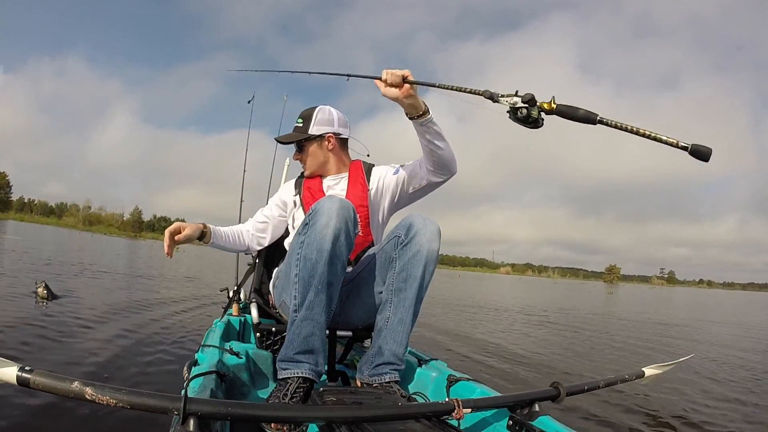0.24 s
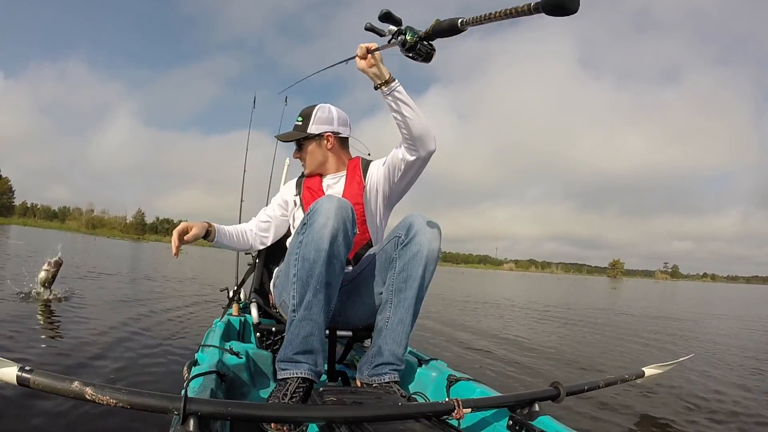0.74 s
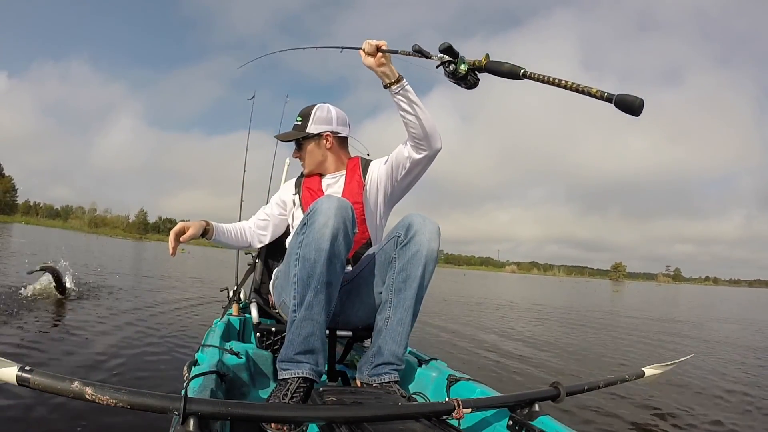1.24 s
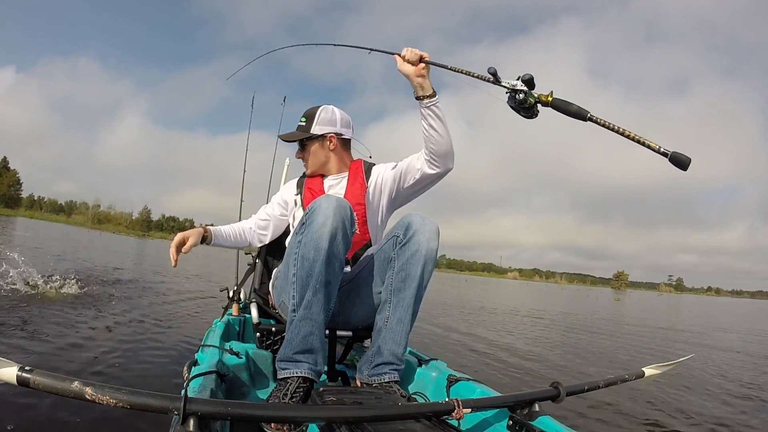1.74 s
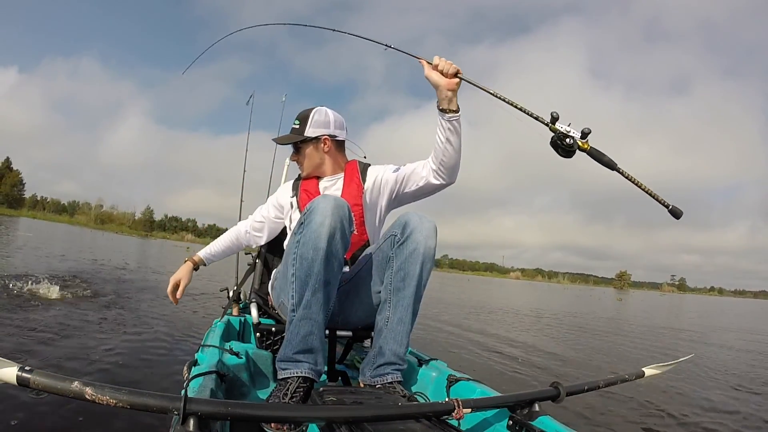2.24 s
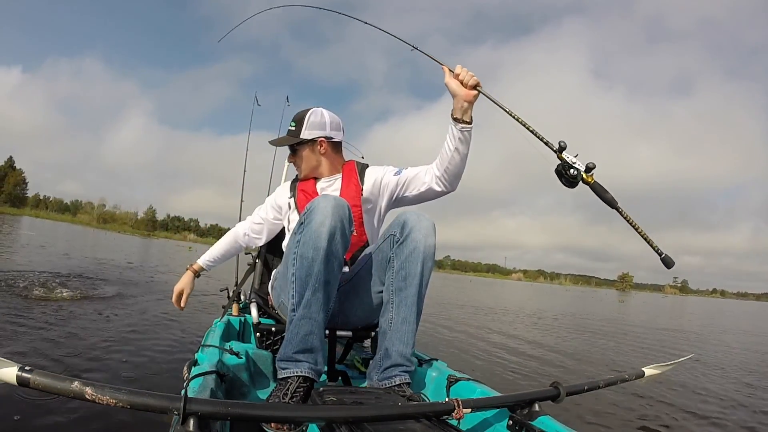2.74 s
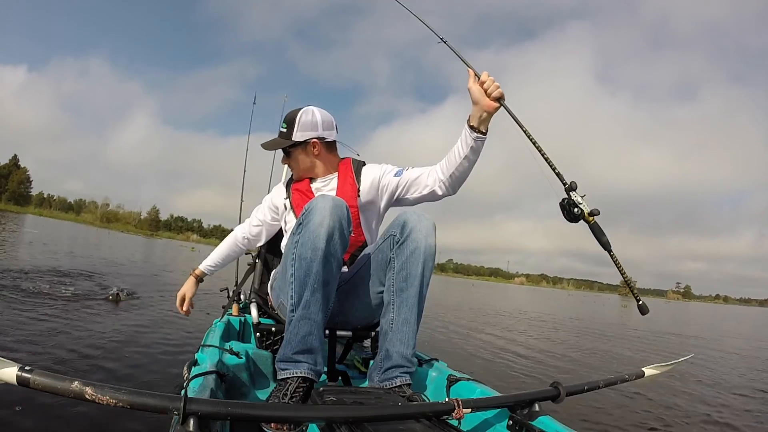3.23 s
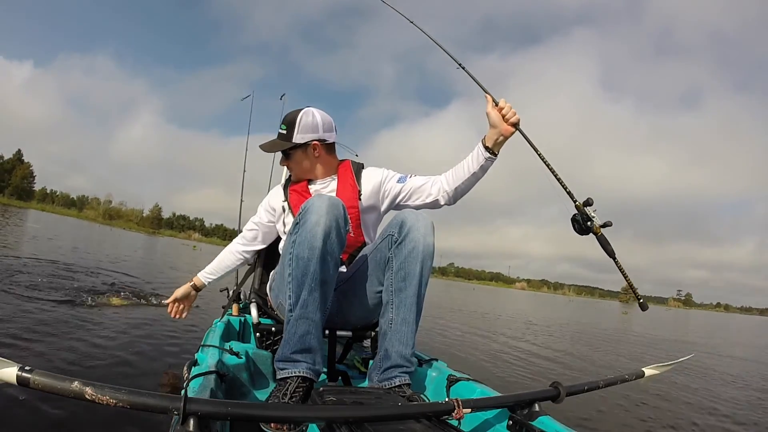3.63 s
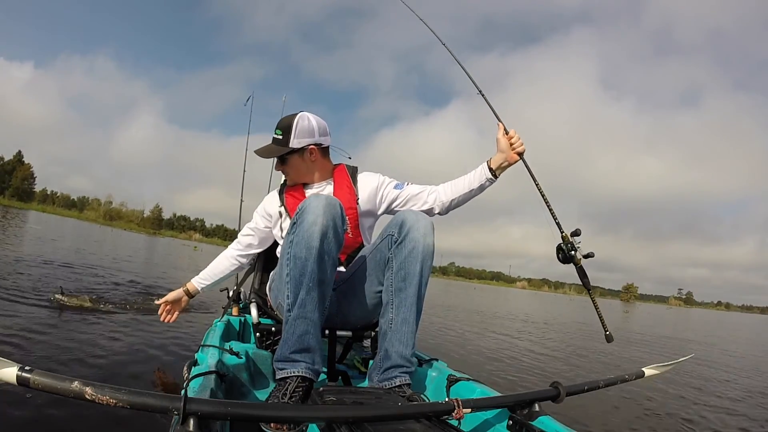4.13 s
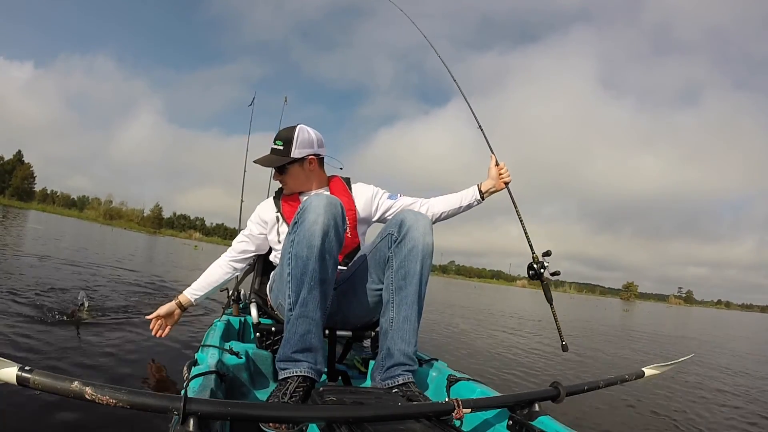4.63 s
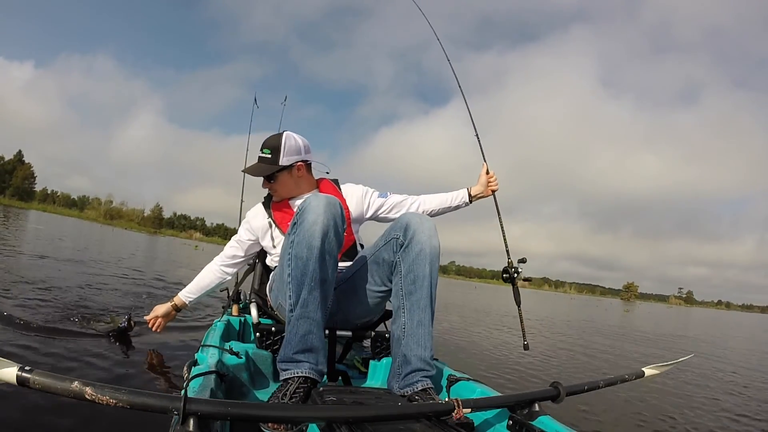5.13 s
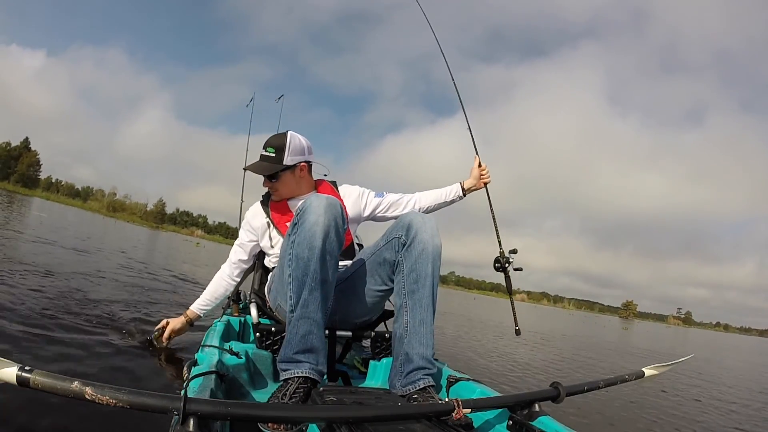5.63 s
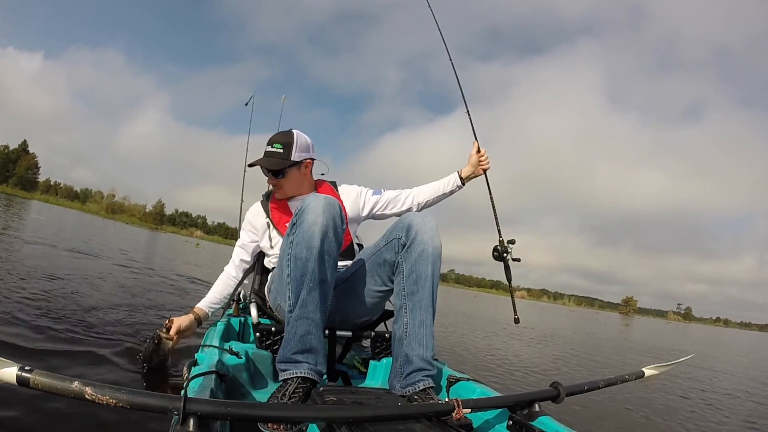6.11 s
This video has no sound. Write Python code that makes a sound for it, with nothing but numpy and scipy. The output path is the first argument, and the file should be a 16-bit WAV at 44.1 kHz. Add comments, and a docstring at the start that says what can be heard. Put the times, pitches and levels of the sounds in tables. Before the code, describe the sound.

Low, slowed-down watery gulps and splashes from a thrashing fish, then brighter small slaps and bubbles beside a kayak, fading to quiet lake breeze.

```python
"""A breeze rumbles over a lake; then a hooked fish leaps and thrashes beside a kayak, heard through a camera's
waterproof housing. Its blows trap air pockets that gulp (decaying tones), its tail slaps (noise bursts), water
churns and sprays (swarms of ringing bubbles and drops), and bubbles and falling drops sing (sliding tones).
The leap plays at half speed, an octave down; the fish is then drawn in to the hand, sloshing, at normal speed."""
import sys
import numpy as np
from scipy import signal
from scipy.fft import rfft, irfft
from scipy.io import wavfile

SR = 44100
rng = np.random.default_rng(int(sys.argv[2]) if len(sys.argv) > 2 else 0)


def waveform_to_disk(signal):
    """Save audio, clipped to [-1, 1], as 16-bit WAV at the path in sys.argv[1]."""
    frames = np.transpose(np.atleast_2d(signal))
    scaled = np.clip(frames, -1, 1) * 32767
    samples = np.round(scaled).astype(np.int16)
    wavfile.write(sys.argv[1], SR, samples)


N = 280910

T = np.arange(N) / SR
FREQ_HZ = np.arange(N // 2 + 1) * SR / N
SLOW_UNTIL_S = 2.94   # playing time


def from_db(db):
    """Decibels to gain."""
    return 10 ** (np.asarray(db) / 20)


def rms_one(x):
    """Scale to rms 1."""
    return x / np.sqrt(np.mean(x ** 2) + 1e-20)


def speed(s):
    """Playing speed at playing time s."""
    return .5 if s < SLOW_UNTIL_S else 1


def real_time(s):
    """Seconds gone by on the lake at playing time s."""
    return s - np.minimum(s, SLOW_UNTIL_S) / 2


def gain_curves(rows):
    """Columns of dB over playing time, as gains in real time."""
    s, *columns = np.transpose(rows)
    return [from_db(np.interp(T, real_time(s), db)) for db in columns]


def at_hz(points, hz):
    """Read a spectrum in dB on a log-frequency axis."""
    f, db = np.transpose(points)
    return np.interp(np.log(np.maximum(hz, 1)), np.log(f), db)


def add(out, s, sound):
    """Mix a sound in at the real time of playing time s."""
    i = int(real_time(s) * SR)
    out[i:i + len(sound)] += sound[:N - i]


def cut(x, hz, kind, order=2):
    """Butterworth filter."""
    return signal.sosfilt(signal.butter(order, hz, kind, fs=SR, output="sos"), x)


def drift(rate_hz):
    """Slow random curve of rms 1."""
    spectrum = rfft(rng.standard_normal(N))
    return rms_one(irfft(spectrum / (1 + (FREQ_HZ / rate_hz) ** 2), N))


def shaped_noise(spectrum):
    """Noise with the given spectrum, rms 1."""
    white = rfft(rng.standard_normal(N))
    return rms_one(irfft(white * from_db(at_hz(spectrum, FREQ_HZ)), N))


def resonate(x, hz, width_hz):
    """Two-pole resonance with gain 1 at its peak."""
    r = np.exp(-np.pi * width_hz / SR)
    zeros = np.array([1, 0, -1]) * (1 - r * r) / 2
    poles = [1, -2 * r * np.cos(2 * np.pi * hz / SR), r * r]
    return signal.lfilter(zeros, poles, x + 1e-18)


def grains(per_s, spread_db):
    """Random impacts, many small and a few large."""
    level_db = spread_db * np.minimum(rng.exponential(1, N), 3.5)
    impacts = from_db(level_db) * rng.choice([-1, 1], N)
    return impacts * (rng.random(N) < per_s / SR)


def bubbles(sizes, per_s, ring_cycles, spread_db, count=22):
    """Swarm of bubbles or drops, each ringing at the pitch of its size; rms 1."""
    births = grains(per_s, spread_db)
    pitches_hz = np.geomspace(sizes[0][0], sizes[-1][0], count)
    dealt = rng.integers(0, count, N)
    swarm = np.zeros(N)
    for k, hz in enumerate(pitches_hz):
        ring = resonate(births * (dealt == k), hz, hz / (np.pi * ring_cycles))
        swarm += from_db(at_hz(sizes, hz)) / hz * ring
    return rms_one(swarm)


# treble resonances of the plastic shell: (centre [Hz], width [Hz], relative level [dB])
HOUSING_MODES = [(3640, 100, -6), (3700, 150, -9.5), (4518, 220, 10), (4830, 1550, -7.5), (5650, 330, -4),
                 (6080, 260, -5.5), (7600, 160, -12), (9300, 500, -32.5), (10480, 700, -11.5),
                 (11800, 330, -19)]


def housing(x):
    """The plastic shell passes treble mostly at its resonances; rms 1."""
    rings = sum(from_db(db) * resonate(x, hz, width_hz) for hz, width_hz, db in HOUSING_MODES)
    return rms_one(cut(cut(rings, 2800, "high", order=3), 13800, "low", order=6))


# spectrum of breeze and distant water: (frequency [Hz], relative density [dB per Hz])
BREEZE_SPECTRUM = [(20, -10.5), (45, 0), (90, 2.5), (135, 3), (190, -3), (270, -6.5), (400, -16),
                   (800, -19), (1100, -29), (2000, -29), (4000, -35.5), (8000, -43.5), (12000, -47.5),
                   (13200, -50)]
# rumble strength: (time as played [s], level [dB])
GUSTS_CURVE = [(0, -41), (1.8, -40), (2.4, -40), (2.9, -40.5), (6.37, -40.5)]


def breeze(buffet_db=1.0, buffet_rate_hz=58, hiss_db=-41, rumble_top_hz=350):
    """Uneven wind rumble on the housing, under a smooth hiss."""
    air = shaped_noise(BREEZE_SPECTRUM)
    rumble = irfft(rfft(air) / (1 + (FREQ_HZ / rumble_top_hz) ** 4), N)
    strength, = gain_curves(GUSTS_CURVE)
    buffeting = from_db(buffet_db * drift(buffet_rate_hz))
    return rumble * strength * buffeting + from_db(hiss_db) * (air - rumble)


# water between bouts: (time as played [s], bubbling wash [dB], drops falling back [dB], spray mist [dB])
WASH_LEVELS = [(0, -58.5, -74, -95), (.45, -59, -62, -67.5), (.95, -39.5, -48, -54),
               (1.3, -48.5, -51.5, -59.5), (1.8, -40, -50.5, -59.5), (2.4, -43, -53, -62.5),
               (2.95, -52, -69.5, -83), (3.7, -55.5, -62, -68.5), (4.1, -52.5, -67.5, -75),
               (5.6, -55, -67, -79), (6.37, -59.5, -66, -77)]
# bouts: (time as played [s], length as played [s], churning bubbles [dB], splashing droplets [dB])
THRASH_BOUTS = [(0.5, .08, -49.5, -63), (0.6, 0.079, -47, -50.5), (0.746, .032, -23.5, -39.5),
                (0.881, 0.1, -38.5, -46.5), (1.1, 0.015, -40, -52.5), (1.41, 0.15, -38.5, -49),
                (1.644, 0.026, -29.5, -37.5), (1.935, 0.041, -29, -44), (2.03, 0.021, -36, -41.5),
                (2.3, 0.12, -38.5, -65), (2.76, 0.093, -44, -62), (3.4, 0.095, -43, -50),
                (3.55, 0.19, -43.5, -53), (3.629, 0.026, -32.5, -60), (3.92, 0.079, -46, -71),
                (4.28, 0.052, -42.5, -70), (4.519, 0.018, -45, -64), (4.61, 0.066, -43.5, -64),
                (4.758, 0.092, -43.5, -63), (5.02, 0.049, -46.5, -78), (5.56, .05, -54.5, -69)]


def agitation(attack_s=0.0098, churn_release_s=0.012, drops_release_s=0.024, spray_re_droplets_db=-20):
    """Gains of churn, droplets, spray: bouts swell, hold and die into the wash; drops fall on after the churn."""
    power = np.square(gain_curves(WASH_LEVELS))
    release_s = np.array([[churn_release_s], [drops_release_s], [drops_release_s]])
    for s, length_s, churn_db, droplets_db in THRASH_BOUTS:
        t = T - real_time(s)
        swell = np.minimum(t, 0) / attack_s
        ebb = np.maximum(t - length_s * speed(s), 0) / release_s
        peak = from_db([[churn_db], [droplets_db], [droplets_db + spray_re_droplets_db]])
        power += (peak * np.exp(np.maximum(swell - ebb, -20))) ** 2
    return np.sqrt(power)


# churning bubble strength by size: (real-time pitch [Hz], relative level [dB])
CHURN_SIZES = [(330, -10.5), (450, 1), (560, 3), (720, 4.5), (880, 2), (1020, -0.5), (1150, -12)]


def churn():
    """Big bubbles ring under the fish; rms about 1."""
    return cut(bubbles(CHURN_SIZES, per_s=910, ring_cycles=5.6, spread_db=5.0), 1246, "low", order=4)


# plinking droplet strength by size: (real-time pitch [Hz], relative level [dB]); also colours slaps
PLINK_SIZES = [(1100, 4), (1400, -4), (1700, 1.5), (2100, -5), (2400, -4), (2900, -20), (3350, -4),
               (3700, -24.5)]


def droplets():
    """Droplets plink back on the lake; rms about 1."""
    return cut(bubbles(PLINK_SIZES, per_s=1500, ring_cycles=6.6, spread_db=4.5), 3300, "low", order=4)


# fine spray strength by drop size: (real-time pitch [Hz], relative level [dB])
MIST_SIZES = [(3000, 4.5), (4400, -5.5), (5200, -2), (7000, 1.5), (9500, 4.5), (11500, 5.5), (13500, 9.5)]


def spray(clump_db=1.0, clump_rate_hz=57):
    """Fine drops fizz in clumps through the housing."""
    fizz = housing(bubbles(MIST_SIZES, per_s=5000, ring_cycles=8.9, spread_db=4.0))
    return fizz * from_db(clump_db * drift(clump_rate_hz))


def stirred_water():
    """Churn, droplets and spray follow the agitation of the water."""
    churn_gain, droplet_gain, spray_gain = agitation()
    return churn_gain * churn() + droplet_gain * droplets() + spray_gain * spray()


def sliding_tones(rows, rise_oct_per_s, rough, broken_db=3.0):
    """Bubbles or drop clusters slide in pitch as they change size; roughness 0-1 breaks up the tone."""
    out = np.zeros(N)
    scatter = (drift(rate_hz=600) + 1j * drift(rate_hz=600)) / np.sqrt(2)
    scatter = scatter * rms_one(from_db(broken_db * drift(rate_hz=120)))   # uneven bunches
    noisy = rough ** 2
    for k, (s, length_s, start_hz, db) in enumerate(rows):
        along = np.linspace(0, 1, int(length_s * speed(s) * SR))
        real_hz = start_hz / speed(s) * 2 ** (rise_oct_per_s * T[:len(along)])
        phase = 2 * np.pi * np.cumsum(real_hz) / SR
        cluster = 1 - noisy + noisy * scatter[k * SR // 10:][:len(along)]
        add(out, s, from_db(db) * np.sin(np.pi * along) * np.real(cluster * np.exp(1j * phase)))
    return out


# streams of like-sized drops: (time [s], length [s], start pitch [Hz], level [dB]), all as played
TRICKLE_STREAMS = [(.74, .02, 842, -32), (.899, 0.01, 2113, -31.5), (1.368, 0.017, 2950, -48.5),
                   (1.437, 0.016, 2027, -32), (1.715, .05, 3040, -47.5), (2.365, 0.087, 4800, -62),
                   (2.405, 0.074, 3350, -54), (2.445, 0.074, 2500, -51.5), (2.685, .11, 1420, -52.5),
                   (3.395, 0.023, 1867, -43), (3.58, 0.038, 2056, -44), (3.622, 0.049, 1827, -38.5),
                   (3.625, 0.071, 3560, -52.5), (3.89, 0.013, 2130, -44), (3.93, 0.014, 1865, -45),
                   (4.168, 0.012, 2110, -46), (4.28, 0.011, 970, -34.5), (4.33, 0.015, 2020, -47),
                   (4.6, .09, 2290, -54), (4.79, 0.058, 2150, -52.5)]


def trickles():
    """Drops falling back give rough tones that sink; slide in real time."""
    return sliding_tones(TRICKLE_STREAMS, rise_oct_per_s=-3, rough=0.85)


# single bubbles: (time [s], length [s], start pitch [Hz], level [dB]), all as played
GURGLE_BUBBLES = [(.455, 0.056, 643, -55), (3.295, .032, 475, -38.5), (3.37, 0.027, 570, -38.5),
                  (3.925, 0.043, 229, -35.5), (3.955, 0.046, 339, -36), (3.983, 0.028, 655, -43),
                  (4.042, 0.048, 532, -41), (4.18, .04, 655, -49)]


def gurgles():
    """Single bubbles sing upwards, nearly clean, as they surface; slide in real time."""
    return sliding_tones(GURGLE_BUBBLES, rise_oct_per_s=18.7, rough=0.19)


# slaps and flicks: (time as played [s], splash level [dB], spray level [dB], decay in real time [s])
SURFACE_SLAPS = [(0.49, -52, -44, 0.0021), (0.596, -41, -43, 0.0065), (0.731, -32.5, -43.5, 0.014),
                 (0.901, -23.5, -32.5, 0.0042), (0.9245, -26.5, -30, .0036), (1.1, -41, -46.5, 0.0075),
                 (1.34, -36.5, -47.5, 0.015), (1.432, -33, -46, 0.0056), (1.649, -31, -38.5, 0.0059),
                 (1.658, -27.5, -37, 0.0049), (1.8, -40, -51.5, 0.0084), (1.952, -35, -63, 0.0063),
                 (2.18, -49, -44.5, 0.0026), (2.297, -40, -54, 0.011), (3.406, -40.5, -61, 0.0061),
                 (3.449, -41, -57, 0.0059), (3.488, -40, -56, 0.006), (3.53, -40.5, -62, 0.0092),
                 (3.625, -30.5, -65, 0.0037), (3.63, -35, -62, 0.0049), (3.723, -40, -53, 0.0058),
                 (3.762, -31, -73, 0.0016), (4.283, -43, -52, 0.0029), (5.4106, -43, -47.5, 0.0024),
                 (5.572, -42, -54, .004)]


def slaps(attack_s=0.0011):
    """A slap's many drops merge into one noise burst, with a hiss of spray on top."""
    splash_burst, spray_burst = np.zeros(N), np.zeros(N)
    t = T[:SR // 10]
    for s, splash_db, spray_db, decay_s in SURFACE_SLAPS:
        burst = (1 - np.exp(-t / attack_s)) * np.exp(-t / decay_s)
        add(splash_burst, s, from_db(splash_db) * burst)
        add(spray_burst, s, from_db(spray_db) * burst)
    splash = cut(shaped_noise(PLINK_SIZES), 450, "high", order=3)
    splash = rms_one(cut(splash, 5000, "low", order=5))
    return splash_burst * splash + spray_burst * housing(rng.standard_normal(N))


def hull_echoes(x, level_db=-14, decay_s=0.014, delay_s=.003):
    """Hull and waves scatter a short dull tail."""
    t = T[:SR // 10]
    tail = cut(rng.standard_normal(len(t)), 1100, "low") * np.exp(-t / decay_s) * (t > delay_s)
    tail = tail / np.sqrt(np.sum(tail ** 2) * SR / 3000)
    return from_db(level_db) * signal.fftconvolve(x, tail)[:N]


# blows that trap air: (time as played [s], first pocket level [dB], first pitch as played [Hz],
# first pocket ring [cycles], length of the run of pockets in real time [s])
AIR_BLOWS = [(0.5417, -31.5, 462, 4.8, 0.0046), (0.601, -24.5, 360, 0.45, .005),
             (0.6706, -35.5, 328, 3.5, .005), (0.7379, -11, 400, 3.2, 0.0077),
             (0.754, -7.5, 364, 0.46, 0.011), (0.78, -7.5, 310, 1.4, 0.017), (0.813, -16, 239, 0.83, 0.01),
             (0.8788, -17.5, 256, 0.39, 0.015), (0.9157, -25, 187, 1.5, 0.016),
             (0.927, -19, 380, .4, 0.0076), (0.954, -23.5, 316, 0.97, 0.016),
             (1.1234, -26.5, 357, 1.05, 0.0041), (1.252, -33, 344, 2.1, .008),
             (1.4407, -23.5, 300, 2.4, 0.0086), (1.5201, -19.5, 343, 0.5, .006),
             (1.5338, -17.5, 333, 2.2, 0.031), (1.5773, -22, 330, 1.5, .006),
             (1.6294, -12, 260, 1.2, 0.0064), (1.6673, -16.5, 428, 0.64, 0.0076),
             (1.807, -24.5, 493, 1.9, .006), (1.9257, -24, 331, 1.6, 0.084),
             (1.966, -23.5, 133, 1.9, 0.0064), (1.9682, -15.5, 271, 0.74, 0.017),
             (2.0628, -18, 223, 0.82, 0.011), (2.3014, -14.5, 359, 1.2, 0.013),
             (2.3163, -17.5, 150, 0.68, 0.014), (2.3438, -25.5, 283, 3.2, 0.011),
             (3.4131, -33, 882, 1.4, .004), (3.4516, -27.5, 864, 1.2, .004),
             (3.4893, -21.5, 588, 2.4, 0.004), (3.5351, -31.5, 700, 2.5, 0.0091),
             (3.5951, -29.5, 594, 2.3, .005), (3.6326, -11, 694, 1.37, 0.0036),
             (3.6426, -15.5, 625, 0.83, .008), (3.6812, -32, 594, 2.5, 0.011),
             (3.71, -34.5, 765, 3.1, 0.027), (4.282, -26.5, 700, 3, .004), (4.2872, -16, 473, 0.18, 0.027),
             (4.5136, -36.5, 940, 3.7, 0.0066), (4.7689, -33, 610, 2.8, .02),
             (5.4324, -36, 650, 0.68, .004), (5.577, -37, 546, 1.7, .006), (5.657, -38, 656, 1.2, .005),
             (5.95, -42.5, 854, 7.1, .006)]


def pockets(count=6, gap_s=.0046, fade_db=16.5, sag_oct_per_s=16, later_ring_cycles=0.99,
            scatter_db=2, scatter_oct=0.29, scatter_gaps=0.21):
    """A blow closes one ringing pocket, then a run of weaker, lower ones: (s, dB, Hz, cycles)."""
    rows, k = [], np.arange(count)
    chances = rng.standard_normal((len(AIR_BLOWS), 3, count))
    for (s, db, hz, ring_cycles, run_s), chance in zip(AIR_BLOWS, chances):
        late, louder, higher = chance * (k > 0)
        age_s = gap_s * (k + scatter_gaps * late)   # real time
        levels_db = db - fade_db * age_s / run_s + scatter_db * louder
        pitches_hz = hz * 2 ** (scatter_oct * higher - sag_oct_per_s * age_s)
        rings = np.where(k > 0, later_ring_cycles, ring_cycles)
        rows += zip(s + age_s / speed(s), levels_db, pitches_hz, rings)
    return rows


def gulps(least_rise_cycles=0.71, rise_share=0.6, glide=0.031, overtone_ratio=1.9, overtone_db=-21):
    """Each pocket swells and rings down, rising a little in pitch as it nears the surface."""
    out = np.zeros(N)
    t = T[:SR // 10] - .02   # the swell begins before the blow
    rows = pockets()
    phases = rng.uniform(0, 2 * np.pi, len(rows))
    for (s, db, hz, ring_cycles), phase in zip(rows, phases):
        cycles = t * hz / speed(s)
        rise_cycles = least_rise_cycles + rise_share * ring_cycles
        swell = np.sin(np.pi / 2 * np.clip(1 + cycles / rise_cycles, 0, 1)) ** 2
        envelope = swell * np.exp(-np.maximum(cycles, 0) / max(ring_cycles, .3))
        turn = 2 * np.pi * cycles * (1 + glide * np.tanh(cycles / 10))
        # a lopsided pocket also wobbles in a higher mode
        wobble = np.cos(turn) + from_db(overtone_db) * np.cos(overtone_ratio * turn + phase)
        add(out, s + t[0] / speed(s), from_db(db) * envelope * wobble)
    return cut(out, 1700, "low", order=3)


def scene():
    """Everything on the lake, in real time."""
    trapped_air = gulps()
    background = breeze() + stirred_water() + trickles() + gurgles()
    fish = slaps() + hull_echoes(trapped_air) + trapped_air
    return (background + fish)[None]


def record(dry, cutoff_hz=15200):
    """Low-pass, then draw the first stretch out to twice its length, which halves its bandwidth."""
    top = signal.ellip(10, .2, 80, cutoff_hz, fs=SR, output="sos")
    sound = signal.sosfilt(top, dry[0])
    turn = int(real_time(SLOW_UNTIL_S) * SR)
    slow = signal.resample_poly(sound, 2, 1)[:2 * turn]
    played = np.concatenate([slow, sound[turn:]])
    return signal.sosfilt(top, played[None, :N])


dry = scene()
out = record(dry)
waveform_to_disk(out)
```